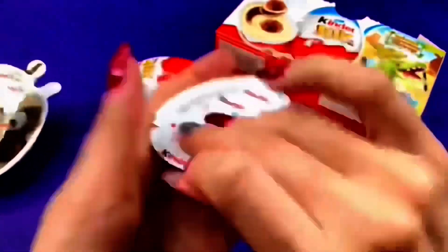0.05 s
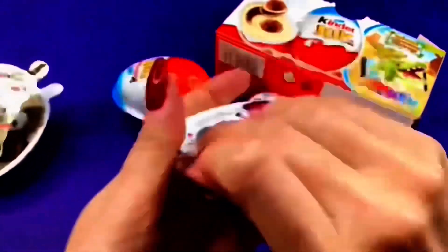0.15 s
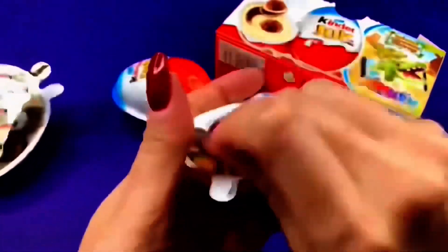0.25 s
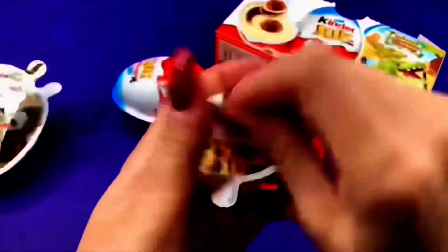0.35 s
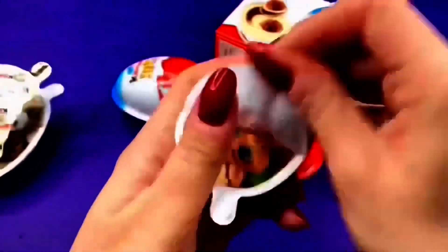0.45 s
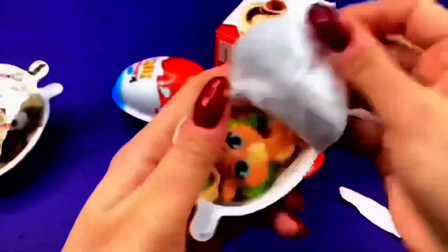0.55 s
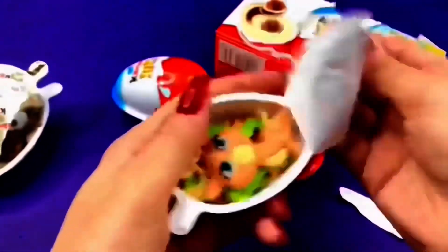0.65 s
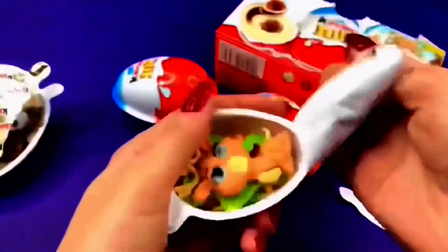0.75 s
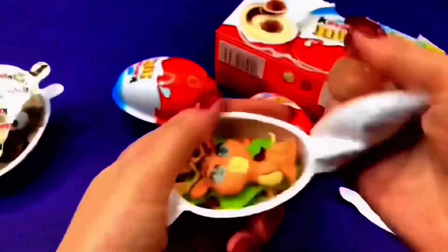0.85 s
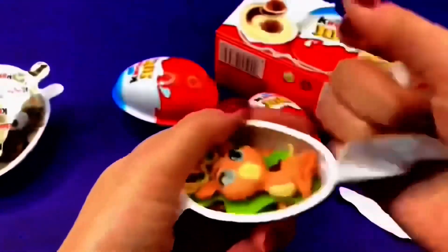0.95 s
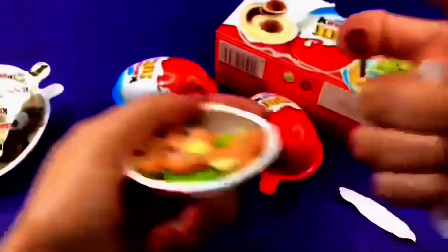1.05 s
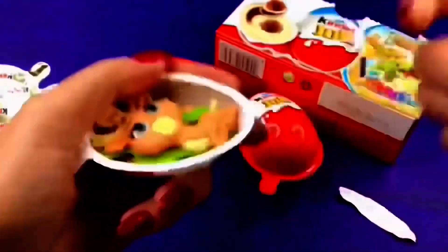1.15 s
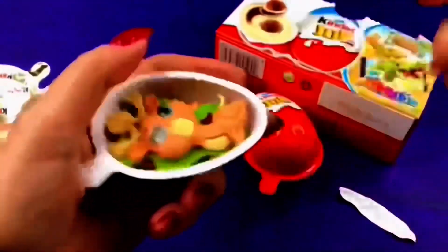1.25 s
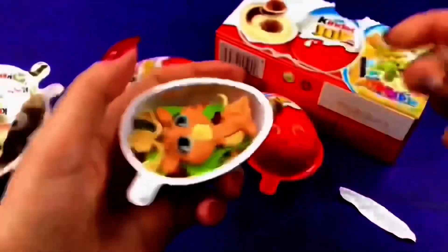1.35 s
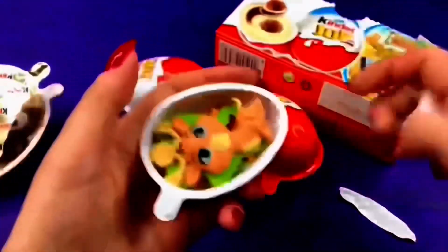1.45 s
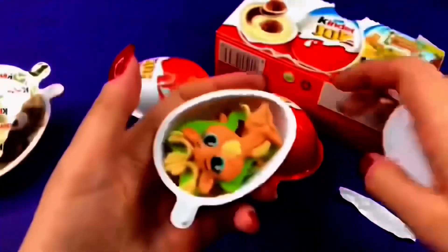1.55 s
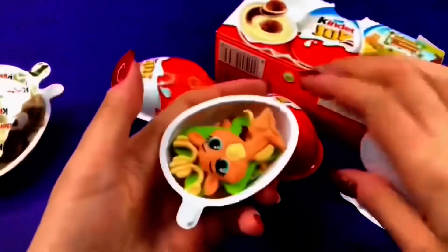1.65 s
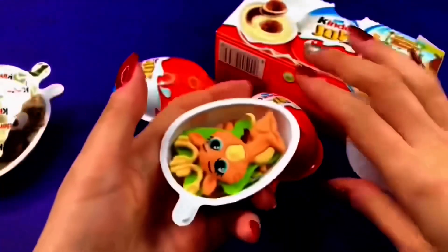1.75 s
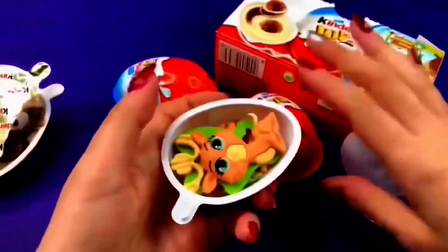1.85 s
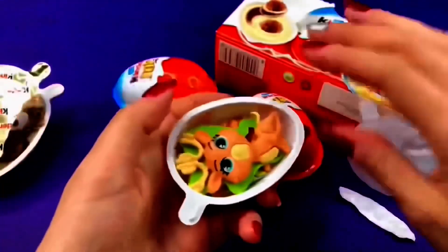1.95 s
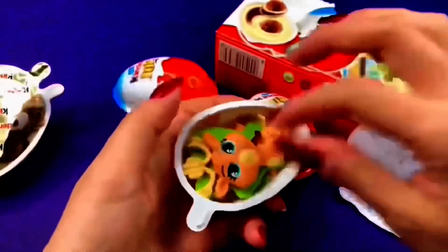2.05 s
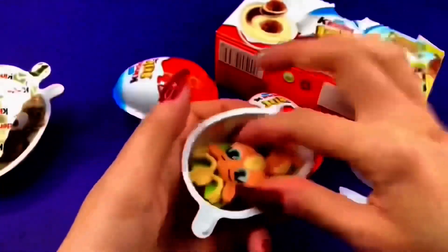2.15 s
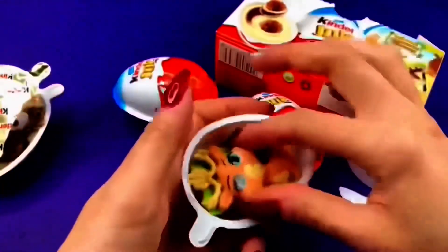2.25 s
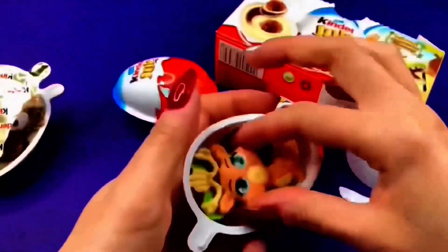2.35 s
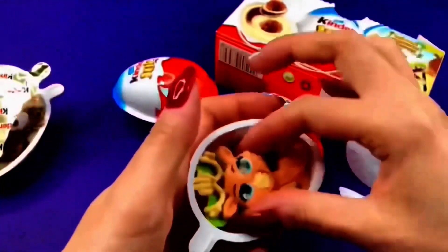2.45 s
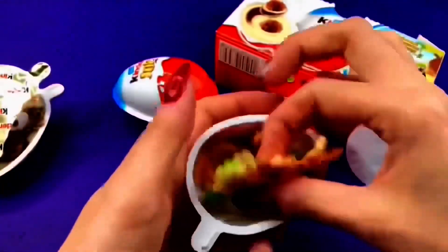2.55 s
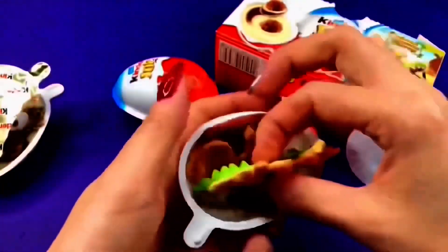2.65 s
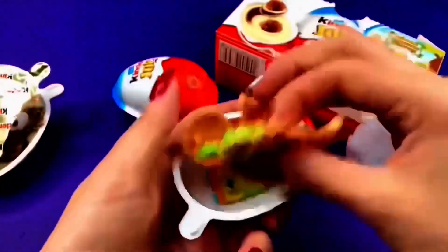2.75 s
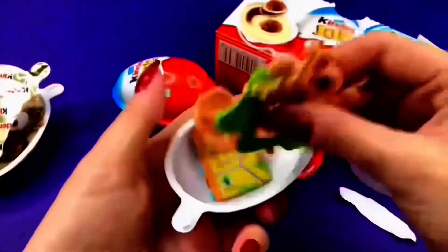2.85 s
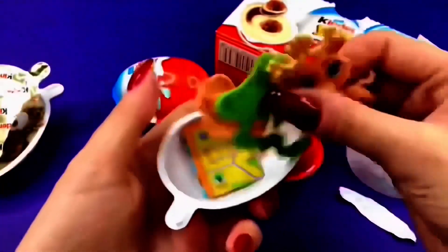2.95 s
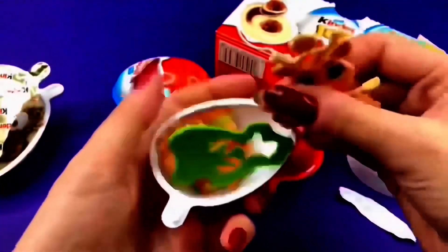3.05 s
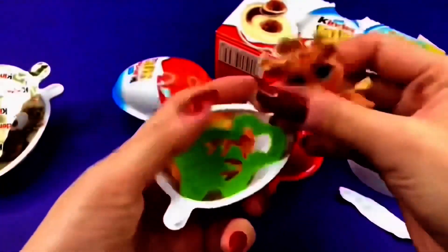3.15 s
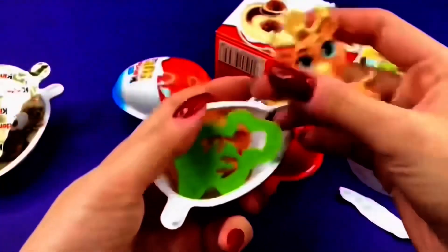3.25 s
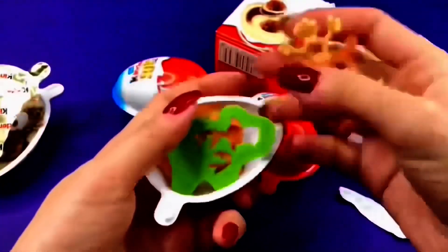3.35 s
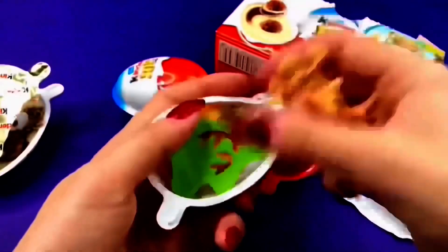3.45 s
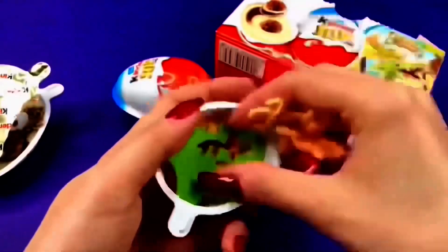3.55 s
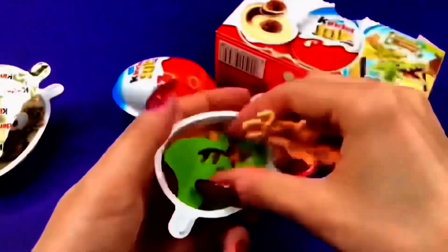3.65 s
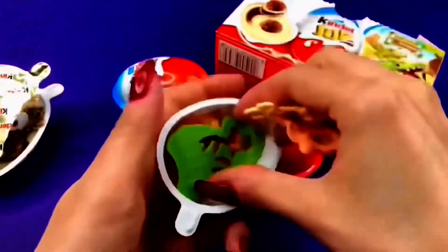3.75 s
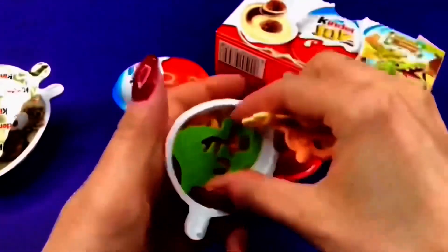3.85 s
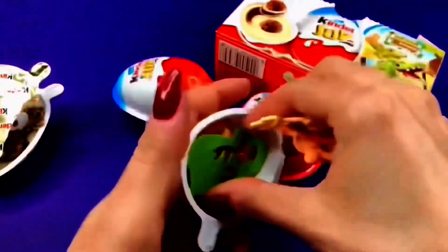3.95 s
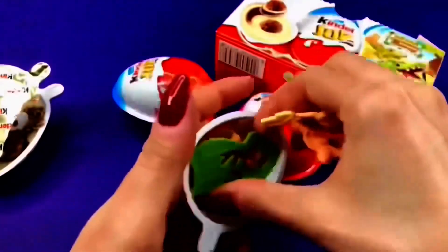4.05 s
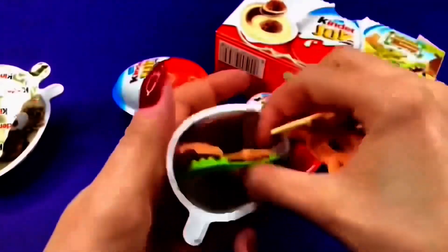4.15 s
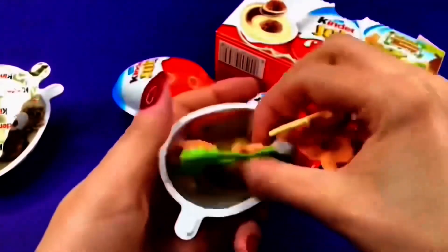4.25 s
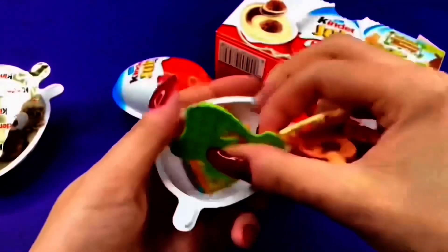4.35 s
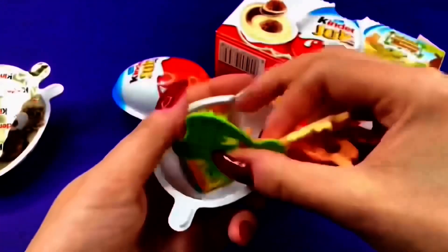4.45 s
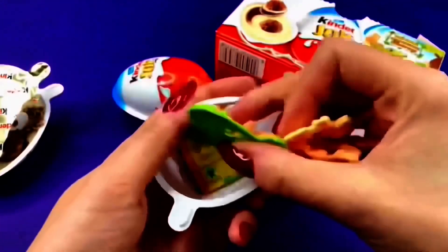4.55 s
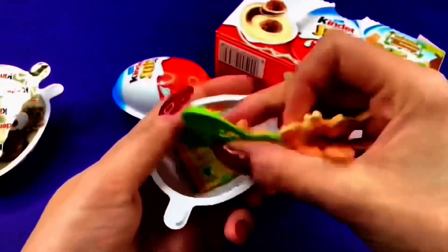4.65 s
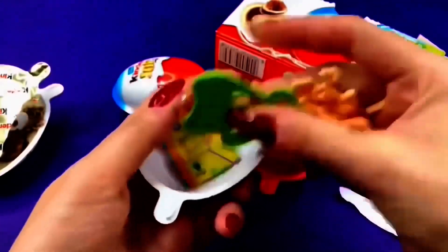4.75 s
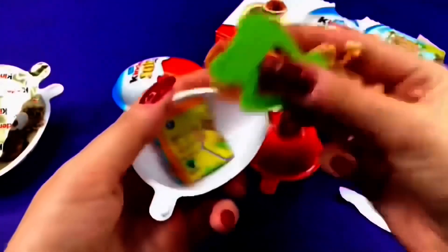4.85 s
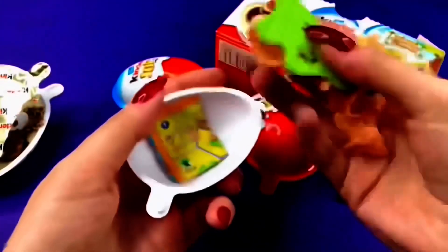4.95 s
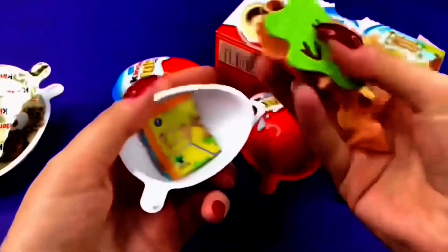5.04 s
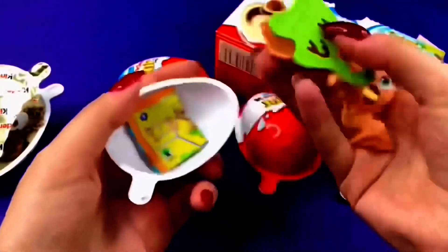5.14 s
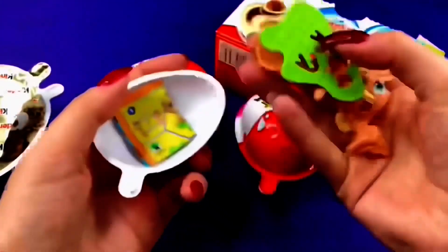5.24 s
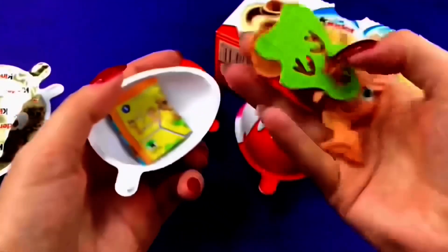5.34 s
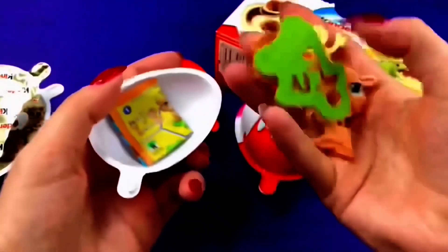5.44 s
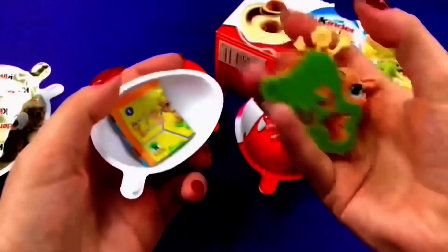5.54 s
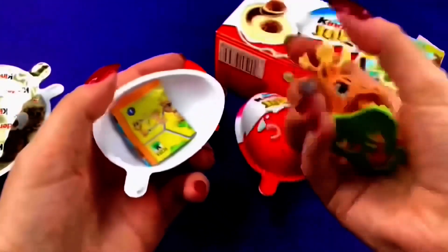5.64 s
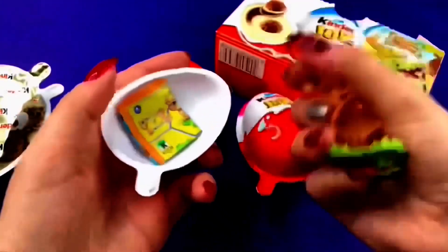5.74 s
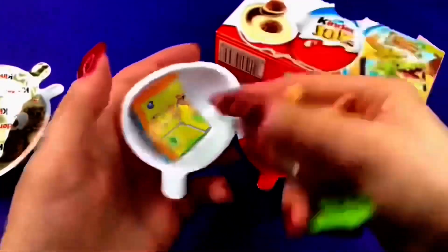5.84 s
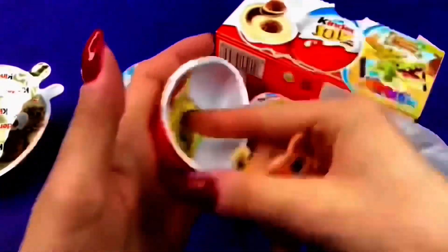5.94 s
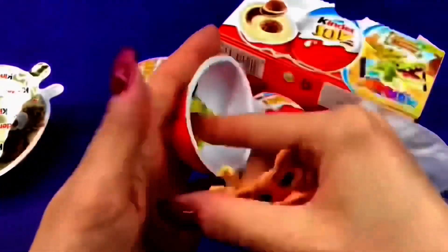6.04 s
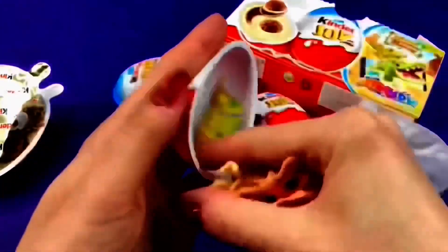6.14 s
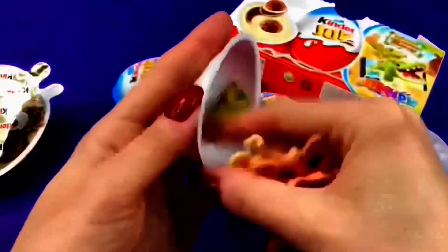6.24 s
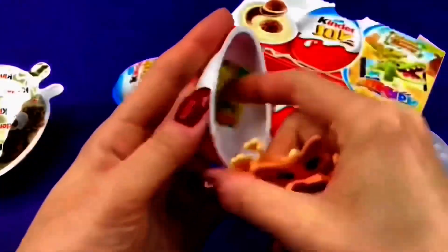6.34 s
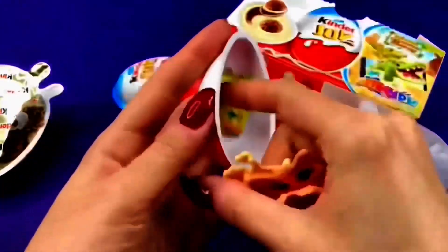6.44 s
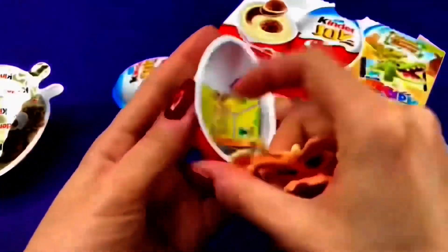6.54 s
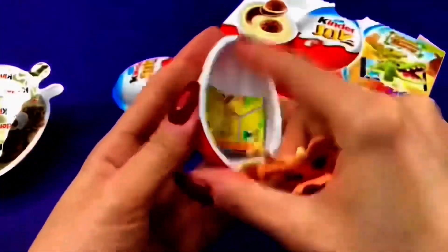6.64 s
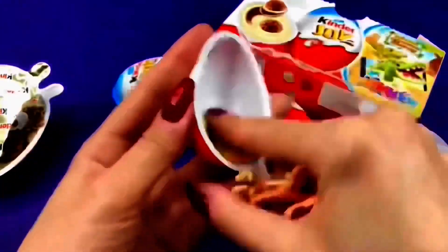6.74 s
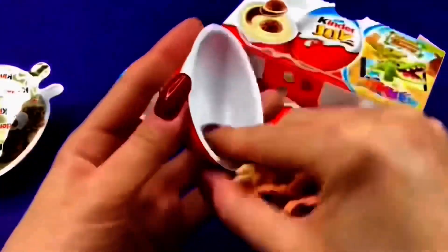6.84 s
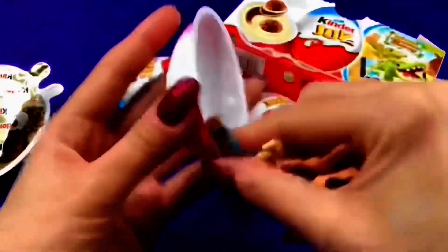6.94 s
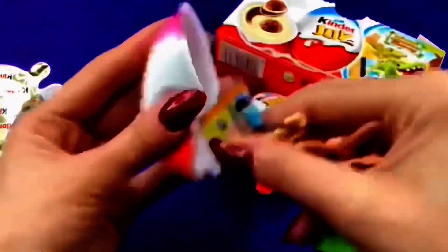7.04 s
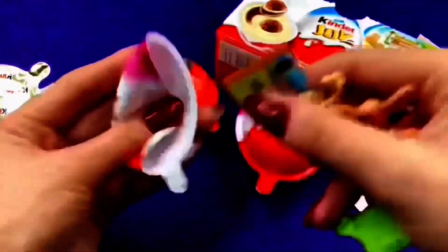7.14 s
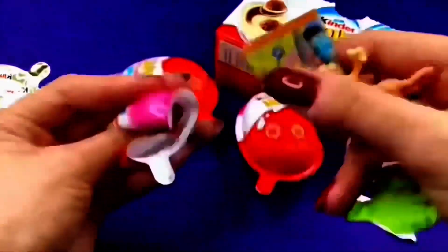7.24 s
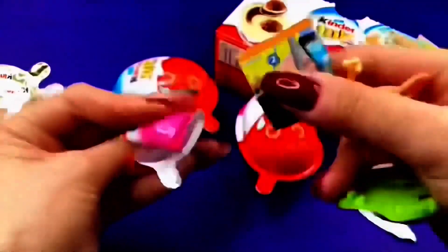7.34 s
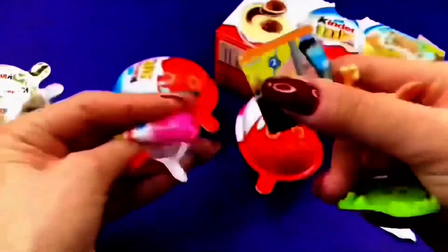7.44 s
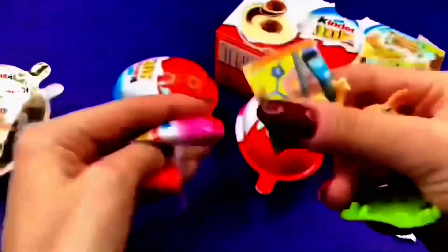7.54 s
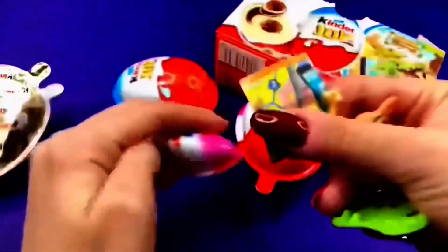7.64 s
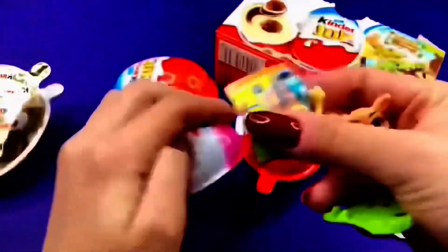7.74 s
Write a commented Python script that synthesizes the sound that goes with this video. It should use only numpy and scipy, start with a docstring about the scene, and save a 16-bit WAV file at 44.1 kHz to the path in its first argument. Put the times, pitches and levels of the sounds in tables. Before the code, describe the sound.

Very close to the microphone, a foil lid is ripped off a plastic half shell in a dense burst of loud snaps, with a few lighter crinkles after. A near-quiet pause follows, then small plastic pieces click, scrape and rattle in the hollow shell, ending in scattered sharp clacks. A faint steady low hum and soft air sit beneath in a small, dry room.

```python
"""Foil lid and plastic shell

Close to a microphone, hands peel a foil lid off a plastic half shell, crumple it, and pick
small plastic parts out of the shell. Snaps and clicks are short decaying rings with a noise crack
and a blunt push. The rustle of rubbing fingers is dense random slips, coloured and resonated.
A machine hums low as a few sines, over filtered-noise air, in a small room of sparse echoes."""
import sys
import numpy as np
from scipy import signal
from scipy.fft import rfft, irfft
from scipy.io import wavfile
from scipy.ndimage import uniform_filter1d

SR = 44100
rng = np.random.default_rng(int(sys.argv[2]) if len(sys.argv) > 2 else 0)


def master_out(mix):
    """Clip the mix to full scale and print it as 16-bit PCM to the path in sys.argv[1]."""
    frames = np.transpose(np.atleast_2d(mix))
    ceiling = np.clip(frames, -1, 1)
    pcm = np.round(ceiling * 32767).astype(np.int16)
    wavfile.write(sys.argv[1], SR, pcm)


N = 343539

# room air and rumble, relative colour: f/Hz, density/dB per Hz
AIR_COLOUR = [(4, -7), (9, 6), (20, -11.5), (45, -16.5), (105, -20.5), (150, -32), (230, -30), (500, -40.5),
              (2000, -52.5), (8000, -61.5), (16000, -61.5)]
AIR_DB = -45  # middle of the slow swell
# machine hum: f/Hz, middle rms level/dB
HUM_TONES = [(41.7, -59), (83.4, -52.5), (100, -64), (125, -55.5), (226, -73.5)]
# room decay: f/Hz, T60/s
ROOM_DECAY = [(600, 0.23), (2400, 0.11), (6000, 0.057), (14000, 0.24)]
# slow puffs of air or jolts that reach the microphone: t/s, peak level/dB
BUMPS = [(0.239, -42), (0.382, -31), (0.651, -51), (1.021, -21.5), (2.158, -30.5), (2.566, -28),
         (5.93, -36)]
# steep loss of the highest treble: f/Hz, level/dB
TOP_EDGE = [(15500, -1), (16000, -24.5), (17000, -27.5)]
EDGE_HZ = 16800  # band limit

# faint rustle of hands that merely hold and shift: t/s, body level/dB, fizz level/dB
REST = [(0, -56, -58), (0.2, -65, -67.5), (0.26, -61, -83), (0.7, -45, -54), (1.1, -58.5, -67),
        (1.499, -71, -68), (1.661, -80.5, -75.5), (2.3, -65.5, -78), (2.7, -66.5, -62.5), (2.93, -83, -86),
        (3.199, -55.5, -68), (3.659, -67, -76.5), (4.2, -55, -64), (4.5, -63.5, -65.5), (5.099, -81, -79.5),
        (5.6, -66, -62.5), (5.88, -84.5, -85), (6.201, -52.5, -64), (6.65, -65.5, -65.5),
        (7.099, -52.5, -63.5), (7.26, -61.5, -67.5), (7.421, -75, -77), (7.79, -65, -61.5)]
# strokes of fingers over foil, parts and wall:
# start t/s, length/s, body level/dB, fizz level/dB, change along the stroke/dB
STROKES = [(0.02, 0.064, -35, -55, -22), (0.225, 0.011, -16.5, -20.5, -1.5), (0.258, 0.038, -37.5, -41, 5),
           (0.32, 0.12, -40.5, -42.5, -7), (0.418, 0.065, -20.5, -26.5, -21.5),
           (0.485, 0.11, -32.5, -39, 3), (0.635, 0.12, -20.5, -25.5, -24.5), (0.748, 0.093, -52, -49, -10),
           (0.859, 0.12, -57, -49.5, 6), (1.009, 0.097, -25, -27.5, -30), (1.208, 0.094, -56.5, -56, 11),
           (1.421, 0.092, -61, -69.5, 13.5), (1.721, 0.028, -52, -56, 2.5), (1.798, 0.028, -56, -60.5, 4.5),
           (1.879, 0.081, -55, -65, -5.5), (2.005, 0.053, -45.5, -59, -6.5),
           (2.142, 0.047, -30.5, -37.5, -5), (2.283, 0.048, -54, -67, 5.5), (2.433, 0.14, -49, -62, 5.5),
           (2.539, 0.07, -30.5, -31.5, -8), (2.637, 0.092, -43, -50, -18), (2.723, 0.086, -47, -50, 1.5),
           (2.832, 0.064, -58.5, -65, 9.5), (2.96, 0.078, -44, -48, -10.5), (3.048, 0.12, -29.5, -37, -17),
           (3.385, 0.036, -40.5, -50, -7), (3.445, 0.046, -37, -42.5, -9), (3.516, 0.09, -41, -51.5, -4),
           (3.691, 0.075, -40.5, -49, -3.5), (3.788, 0.099, -56.5, -71, 3), (3.931, 0.1, -46, -49.5, -17),
           (4.075, 0.036, -39.5, -52, -5), (4.116, 0.029, -35.5, -41.5, 4.5), (4.18, 0.11, -65, -60, -7),
           (4.281, 0.051, -41, -42.5, 3), (4.353, 0.11, -66, -66.5, 8), (4.528, 0.025, -35, -37, -10),
           (4.59, 0.141, -68, -69, 14.5), (5.388, 0.015, -49.5, -49.5, -7), (5.461, 0.098, -62, -60, 4),
           (5.605, 0.13, -56, -58, -3), (5.918, 0.13, -44, -56.5, -19.5), (6.031, 0.095, -65, -73, 28.5),
           (6.098, 0.12, -43.5, -53, -1), (6.333, 0.052, -40.5, -44.5, -10), (6.44, 0.1, -59.5, -62.5, 2.5),
           (6.596, 0.029, -50, -64, -1.5), (6.665, 0.011, -36, -33, -6), (6.697, 0.12, -48.5, -55.5, 3),
           (6.798, 0.16, -32.5, -41.5, -16.5), (6.982, 0.057, -37.5, -48, -1.5),
           (7.105, 0.11, -26.5, -36, -32), (7.308, 0.03, -58.5, -58.5, 7.5),
           (7.483, 0.047, -54.5, -52.5, -2), (7.547, 0.058, -49, -47.5, 4.5),
           (7.593, 0.018, -28.5, -34.5, -4.5), (7.697, 0.041, -54, -56.5, -1.5)]
GRIP_S, LET_GO_DB_PER_S = 0.0096, -700  # how fast a stroke starts and dies away
# relative colour of rubbed sheet and wall: f/Hz, density/dB per Hz
BODY_COLOUR = [(150, -10.5), (500, -3.5), (1000, 3), (1600, -0.5), (2600, 0.5), (3200, -3.5), (4500, -17.5),
               (6000, -46)]
# how the hollow of the shell rings under the rubbing:
# t/s, share of the body power (0-1), narrow part of that ring (0-1)
HOLLOW = [(0, 0.2, 0), (1.4, 0.53, 0), (2.499, 0.35, 0.5), (3.5, 0.53, 0.71), (4.2, 0.53, 0.4),
          (5, 0.57, 0.03), (6.201, 0.25, 0.2), (6.749, 0.93, 0.5), (7.05, 0.85, 0.7), (7.149, 0.58, 0),
          (7.6, 0.4, 0.07)]
# the grip moves the pitch of the hollow a little; the drift is smoothed once more
HOLLOW_HZ, DRIFT_HZ, WIDE_HZ, NARROW_HZ = 2361, 89.54, 910, 427
LAYER_DRIFT_DB, CATCH_SIZE = 2.4, 1.1  # slow drift of each rubbing layer, scale of the catch sizes

# relative colour of cracks and fizz below and above the dip near 8 kHz: f/Hz, density/dB per Hz
CRACK_COLOUR = [(1500, -30), (3500, -1), (5800, -1), (7300, 3.5), (8000, -3.5), (9000, -24)]
HISS_COLOUR = [(7500, -27.5), (8600, -2.5), (9800, -0.5), (13500, -4.5), (17000, -5)]
# how bright the hiss of snaps and rubbing is over time: t/s, level/dB
TREBLE = [(0.24, 5.5), (0.3, -1), (0.7, -1.5), (1.05, 1.5), (2.201, -2), (2.56, 0.5), (3.06, -2),
          (4.1, -1.5), (4.33, -1), (4.6, -5.5), (5.2, 7), (5.6, -1.5), (6.7, -0.5), (7.12, 4.5), (7.3, 7.5),
          (7.55, -4.5), (7.75, -5.5)]

# a fingertip sticks and slips along the wall: from t/s, to t/s, slips per s,
# middle ring peak level/dB, ring f/Hz, crack level/dB, thump peak level/dB
JUDDER = 6.162, 6.226, 155, -28, 2350, -56, -40
# clicks of plastic parts, nails and shell:
# t/s, ring peak level/dB, ring f/Hz, crack level/dB, thump peak level/dB
PLASTIC = [(2.3285, -26.5, 2360, -39, -34.5), (2.4659, -28, 2350, -46.5, -48),
           (2.5292, -11.5, 2210, -28, -38), (2.545, -20.5, 1750, -33, -41), (2.566, -20, 2190, -33, -20),
           (2.5529, -17.5, 1980, -22, -29), (2.5745, -20, 2200, -29, -18), (2.6483, -35, 830, -33, -30),
           (2.7392, -32, 2200, -45, -35), (2.7429, -25, 2420, -41, -31.5),
           (2.7617, -22.5, 2150, -34.5, -31), (2.7942, -32.5, 1680, -28.5, -48),
           (2.9651, -25.5, 2300, -30, -39), (2.9903, -7.5, 2190, -22.5, -21.5),
           (3.0164, -18.5, 2120, -52, -28), (3.0545, -5, 2360, -14.5, -17), (3.0594, -11, 2500, -9, -6),
           (3.0779, -12.5, 2230, -22, -21), (3.0961, -18, 2120, -23, -23), (3.1238, -21, 2410, -47, -19.5),
           (3.147, -30, 2370, -42, -26), (3.1617, -25.5, 2500, -31.5, -33), (3.207, -40, 2390, -38, -48),
           (3.4041, -24, 2660, -36.5, -32), (3.4165, -41, 3000, -42, -44), (3.44, -44, 2310, -38.5, -45),
           (3.4561, -13.5, 2310, -23, -34), (3.481, -31, 3540, -44, -52), (3.5028, -36, 2200, -41, -32),
           (3.5066, -24, 2490, -37, -29), (3.5501, -27, 2250, -53, -32), (3.5592, -25, 2440, -47, -39),
           (3.5985, -27, 2560, -57, -41), (3.6989, -31, 2250, -45, -34), (3.715, -16, 2440, -24, -37),
           (3.7176, -18, 2390, -29.5, -30.5), (3.9519, -32, 2570, -44, -32.5),
           (4.0882, -21, 2210, -27, -31), (4.1288, -30, 2500, -31, -20), (4.1341, -20, 1070, -33, -24),
           (4.142, -19, 2380, -27, -21), (4.1538, -25, 1290, -43, -24), (4.181, -33, 2370, -39, -39),
           (4.2326, -28, 2200, -31.5, -34), (4.236, -36, 2170, -33, -43), (4.269, -23.5, 2430, -46, -44),
           (4.2763, -19, 1430, -29, -26.5), (4.295, -19.5, 2650, -32, -36), (4.4111, -35, 2550, -56, -41),
           (4.492, -43.5, 3760, -48, -58), (4.5332, -28, 3640, -41, -49), (4.5399, -30, 2430, -42.5, -34.5),
           (4.591, -51.5, 3000, -40, -60), (4.6088, -34, 2570, -51, -43), (4.7111, -27.5, 2540, -33.5, -37),
           (4.7283, -25.5, 2430, -29, -46), (4.8664, -37.5, 2355, -51.5, -62.5),
           (4.8825, -36.5, 3620, -44.5, -43), (4.91, -50.5, 3130, -49, -51.5),
           (4.9511, -53, 3930, -45.5, -52), (5.037, -56, 3000, -53, -60), (5.154, -54, 2737, -56, -60.5),
           (5.2044, -68.5, 3380, -36.5, -52), (5.395, -45.5, 3070, -43.5, -58),
           (5.4705, -44, 2650, -36, -65.5), (5.534, -38.5, 3450, -41, -56.5), (5.5539, -41, 2350, -40, -55),
           (5.62, -43, 2920, -44, -54), (5.6631, -30.5, 2450, -31, -48), (5.9207, -37.5, 2330, -44, -43),
           (5.9283, -3, 2520, -22, -51.5), (6.1208, -23, 2560, -32, -26), (6.1255, -11, 2360, -23, -17.5),
           (6.2532, -23, 2600, -42, -48), (6.2857, -23.5, 2600, -36.5, -49),
           (6.2946, -17.5, 2410, -33, -63), (6.3657, -19.5, 2330, -41, -57),
           (6.3788, -31, 2470, -52.5, -55), (6.6656, -29, 2360, -50, -33.5), (6.6705, -9.5, 2350, -16, -50),
           (6.691, -21, 1030, -39, -38), (6.7144, -8.5, 2470, -29, -26.5), (6.8096, -9, 2450, -16, -58),
           (6.9792, -21, 2390, -28, -46), (6.9834, -11, 2320, -14, -44), (6.9879, -11.5, 2480, -28, -50),
           (7.0721, -22.5, 2370, -40, -47), (7.0826, -21.5, 2130, -35, -26.5),
           (7.1121, -3, 2330, -11.5, -17.5), (7.3449, -50, 1710, -42.5, -35),
           (7.4746, -31.5, 2930, -50, -55), (7.5358, -6.5, 2710, -14, -39), (7.6044, -16, 2910, -22, -20.5),
           (7.6147, -14, 1310, -29.5, -16), (7.617, -20.5, 420, -47, -24)]
SHELL_T60_MS, SHELL_SPREAD_DB = 9, 7.5  # usual ring time of a click, and its chance as a dB factor
# foil snaps: t/s, ring peak level/dB, ring f/Hz, crack level/dB, thump peak level/dB, ring T60/ms
FOIL = [(0.0024, -12, 1500, -38, -35.5, 10.6), (0.0262, -7, 3530, -19.5, -33, 9.9),
        (0.0617, -15, 1080, -48.5, -33, 3.6), (0.2296, -2.5, 990, -8.5, -21.5, 8.6),
        (0.2325, -5.5, 3760, -12, -21, 7.2), (0.2362, -7.5, 1290, -13, -27, 6),
        (0.2398, 1, 2170, -9, -26, 8.2), (0.2437, 0, 1710, -10.5, -30, 3.1),
        (0.2735, -6.5, 1300, -29.5, -35.5, 4.2), (0.2824, -4, 1880, -15.5, -31, 6.6),
        (0.2951, -1, 2180, -12, -25, 11), (0.3299, -0.5, 1860, -14, -29, 9.4),
        (0.3346, -7.5, 1740, -24, -32.5, 10), (0.351, -2, 2120, -16.5, -25, 3.6),
        (0.3528, -0.5, 1720, -11.5, -27, 11.3), (0.3675, -21, 1000, -40.5, -31.5, 7.6),
        (0.3855, 2, 1950, -27, -17, 5.5), (0.389, -1.5, 850, -26.5, -21.5, 5.2),
        (0.395, -10, 1490, -38, -31.5, 5.4), (0.4095, -9, 2182, -28.5, -37, 4.1),
        (0.424, 0.5, 2500, -11.5, -17, 6.6), (0.4325, 0.5, 1150, -21, -26.5, 7.6),
        (0.4578, 1.5, 2240, -30.5, -30.5, 3.7), (0.464, -14, 1264, -33, -26.5, 6.9),
        (0.5015, -6, 1680, -30.5, -30, 4.8), (0.515, -3, 2100, -19, -30, 9.5),
        (0.5245, -6.5, 1440, -20, -21, 27), (0.529, 11.5, 2430, -21, -26.5, 9.4),
        (0.5408, -16, 2480, -11, -26.5, 4.3), (0.5635, -11.5, 2490, -25.5, -31.5, 7.2),
        (0.5886, -13, 1340, -27, -28.5, 8.6), (0.6003, -8, 2410, -31, -28, 9),
        (0.6403, 3.5, 2120, -11.5, -27, 11.4), (0.652, 4, 2330, -8, -34.5, 15),
        (0.6563, 6, 2150, -17, -7, 8.6), (0.6722, -5, 2320, -21, -38.5, 8), (0.676, -6, 2170, -23, -38, 12),
        (0.692, -6, 2420, -16, -61, 11.4), (0.8133, -33, 1730, -33.5, -51.5, 12),
        (0.87, -17, 3400, -26.5, -68.5, 6.5), (0.9271, -13, 3130, -18, -20.5, 14),
        (0.948, -20, 3730, -36, -40, 13), (0.9532, -15.5, 2810, -40, -32, 5.2),
        (1.0066, -4.5, 3560, -15, -30, 4.5), (1.0206, -3.5, 3530, -5.5, -3, 1.9),
        (1.0232, -15.5, 2450, -15.5, -22, 18), (1.0568, -15, 2660, -36, -50, 5.2),
        (1.2035, -30, 2700, -29.5, -30.5, 10.6), (1.2553, -22, 2290, -47, -57, 6.8),
        (1.276, -32, 1540, -36.5, -48, 6.3), (1.293, -31, 2000, -44.5, -40, 4.9),
        (1.3022, -20, 4570, -33, -37, 9.2), (1.3453, -32, 1216, -41, -29, 6.8),
        (1.4602, -26, 2283, -60, -26, 6.8), (1.7425, -27.5, 2360, -42.5, -35, 7.4),
        (1.8691, -17.5, 2155, -31, -12.5, 14), (2.1535, -16.5, 2400, -48.5, -40.5, 8.4),
        (2.1581, -26, 2260, -38, -49, 8.2), (2.1756, -27, 2230, -45, -14.5, 4.3),
        (2.1905, -15.5, 2220, -29, -44, 13), (2.1942, -14.5, 2400, -33, -47, 13)]
FOIL_RISE, SHELL_RISE, HISS_FADE = .045, .035, .75  # start as share of ring time; power on hiss fade


def gain_of(db):
    """Decibels to a factor."""
    return 10 ** (np.asarray(db) / 20)


def evened(x):
    """Scales to rms 1."""
    return x / np.sqrt(np.mean(x ** 2) + 1e-20)


def read(points, hz):
    """Reads a spectrum on a log-frequency axis."""
    f, value = np.transpose(points)
    return np.interp(np.log(hz + 1), np.log(f + 1), value)


def add(mix, s, sound):
    """Mixes a sound in at time s."""
    part = mix[round(s * SR):][:len(sound)]
    part += sound[:len(part)]


def coloured(x, points):
    """Causal minimum-phase filter of the given spectrum, with power gain 1 for white noise."""
    log_gain = np.log(gain_of(read(points, abs(np.fft.fftfreq(4096, 1 / SR)))))
    taps = np.fft.ifft(np.exp(np.conj(signal.hilbert(log_gain)))).real[:1024]
    return signal.oaconvolve(x, taps / np.linalg.norm(taps))[:len(x)]


def wander(hz):
    """Slow chance of rms 1: noise through a one-pole low-pass with its corner at hz."""
    return evened(signal.lfilter([1], [1, -np.exp(-2 * np.pi * hz / SR)], rng.standard_normal(N)))


def air():
    """Rumble and faint hiss: shaped noise that swells slowly."""
    hz = np.fft.rfftfreq(N, 1 / SR)
    noise = irfft(rfft(rng.standard_normal(N)) * gain_of(read(AIR_COLOUR, hz)), N)
    swell = uniform_filter1d(wander(hz=4.9), 3000)
    return gain_of(AIR_DB + 2.4 * swell) * evened(noise)


def machine():
    """Steady tones that waver slightly in level."""
    t = np.arange(N) / SR
    hum = np.zeros(N)
    for hz, db in HUM_TONES:
        waver_db = 1.7 * uniform_filter1d(wander(hz=3.2), size=2000)
        tone = np.sin(2 * np.pi * (hz * t + rng.random()))
        hum += np.sqrt(2) * gain_of(db + waver_db) * tone  # sqrt 2 turns rms into peak
    return hum


def room(x):
    """Sparse echoes of random sign, each band dying at its own speed."""
    taps = np.zeros(SR // 2)
    at = np.arange(120, SR // 2 - 20, 20)
    taps[at + rng.integers(0, 20, len(at))] = rng.choice([-1., 1.], len(at))
    hz, t, z = signal.stft(taps, SR, nperseg=256)
    t60 = np.maximum(read(ROOM_DECAY, hz), .02)[:, None]
    tail = signal.istft(z * gain_of(-60 * t / t60), SR, nperseg=256)[1]
    return signal.fftconvolve(x, tail / np.linalg.norm(tail))[:N]


def bumps(length_s):
    """Pressure swells that jump out, then sag below rest and slowly return."""
    out = np.zeros(N)
    u = np.arange(4000) / SR / length_s
    puff = u * (2 - u) * np.exp(-u)
    for s, db in BUMPS:
        add(out, s, gain_of(db) * puff / puff.max())
    return out


def treble():
    """Gain of the hiss over time."""
    return gain_of(np.interp(np.arange(N) / SR, *np.transpose(TREBLE)))


def stroke_gains():
    """Each stroke grips quickly, drifts in level and lets go; powers add over the resting rustle."""
    s, *rest_db = np.transpose(REST)
    power = gain_of([np.interp(np.arange(N) / SR, s, db) for db in rest_db]) ** 2
    for start, length, body_db, fizz_db, change_db in STROKES:
        t = np.arange(0, length + .2, 1 / SR)
        drift_db = change_db * np.minimum(t / length, 1)
        let_go_db = LET_GO_DB_PER_S * np.maximum(t - length, 0)
        shape = np.minimum(t / GRIP_S, 1) * gain_of(drift_db + let_go_db)
        for level, db in zip(power, (body_db, fizz_db)):
            add(level, start, (gain_of(db) * shape) ** 2)
    return np.sqrt(power)


def resonate(x, hz, width_hz):
    """Moving resonance: shifts the curve hz down to zero, smooths twice, and shifts back."""
    turn = np.exp(2j * np.pi * np.cumsum(hz) / SR)
    r = np.exp(-np.pi * width_hz / SR)
    return evened((turn * signal.lfilter([1], [1, -2 * r, r * r], x / turn)).real)


def patchy(x, patches_db):
    """The colour shifts in random patches of time and pitch as the contact moves."""
    z = signal.stft(x, nperseg=256)[2]
    patches = uniform_filter1d(rng.standard_normal(z.T.shape), size=7, axis=0)
    patches = uniform_filter1d(patches, size=6, axis=1)
    return signal.istft(z * gain_of(patches_db * evened(patches).T), nperseg=256)[1][:N]


def rubbing(grains_per_s, lumps_db, own_db, hiss_db):
    """Dense tiny slips of uneven size, in lumps, shake the sheet, ring the hollow and fizz."""
    t = np.arange(N) / SR
    # four layers: sheet, hollow, crack, hiss
    size = gain_of(3.5 * np.minimum(rng.exponential(1, (4, N)), 5)) * rng.choice([-1., 1.], (4, N))
    slips = evened(size * (rng.random((4, N)) < grains_per_s / SR))
    slips += 0.61 * rng.standard_normal((4, N))
    own = np.array([wander(hz=5.7) for _ in range(3)])[[0, 0, 1, 2]]  # sheet and hollow drift together
    lumps = lumps_db * wander(hz=70) + own_db * own
    # now and then an edge catches and lets go
    catches = np.minimum(rng.exponential(CATCH_SIZE, N), 2 * CATCH_SIZE) * (rng.random(N) < 90 / SR)
    catches = np.tile(catches, (4, 1))
    catches[2:] *= 1.4 * rng.random((2, N))  # the fizz takes a share of its own
    ticks = 1 + signal.lfilter([1], [1, -np.exp(-1 / (0.0035 * SR))], catches)
    sheet, hollow, crack, hiss = evened(slips * ticks * gain_of(uniform_filter1d(lumps, 60)))

    s, *shares = np.transpose(HOLLOW)
    share, narrow = np.clip([np.interp(t, s, v) for v in shares], 0, 1)
    hz = HOLLOW_HZ + DRIFT_HZ * uniform_filter1d(wander(hz=7.0), size=400)
    rung = (1 - narrow) * resonate(hollow, hz, WIDE_HZ) + narrow * resonate(hollow, hz, NARROW_HZ)
    body = np.sqrt(1 - share) * coloured(sheet, BODY_COLOUR) + np.sqrt(share) * rung
    fizz = coloured(crack, CRACK_COLOUR) + gain_of(hiss_db) * treble() * coloured(hiss, HISS_COLOUR)
    body_gain, fizz_gain = stroke_gains()
    return patchy(body, patches_db=1.5) * body_gain + patchy(fizz, patches_db=3.0) * fizz_gain


def judder():
    """Click rows for a run of slips, uneven in timing and level."""
    start, end, per_s, ring_db, *rest = JUDDER
    chance = rng.standard_normal((40, 2))
    times = np.arange(start, end, 1 / per_s)
    return [(s + 0.15 * a / per_s, ring_db + 2.9 * b, *rest) for s, (a, b) in zip(times, chance)]


def snaps(rows, hiss_db, rough, rise, thump_s, after_db, after_hz, after_s):
    """Each buckle rings a few rough cycles, with a noise crack, a blunt push and a weak shudder after."""
    t = np.arange(-100, 1000) / SR  # time from the peak
    ring, crack, hiss = np.zeros((3, N))
    chance = rng.standard_normal((len(rows), 2, 1108))
    for (s, ring_db, hz, crack_db, thump_db, t60_ms), (draw, more) in zip(rows, chance):
        begin = s + t[0]
        t60 = max(t60_ms, 1) / 1000
        swell = np.exp(-(np.minimum(t, 0) / (rise * t60)) ** 2)  # longer buckles also start softer
        fade = swell * gain_of(-60 * np.maximum(t, 0) / t60)

        wobble = uniform_filter1d(draw[8:] + 1j * more[8:], size=22)
        wobble = evened(wobble.view(float)).view(complex)
        second_hz = hz * gain_of(3.5 * np.tanh(draw[3]))  # a second mode of its own
        pair = np.exp(2j * np.pi * hz * t) + 0.39 * np.exp(2j * np.pi * second_hz * t)
        modes = (pair * (1 + rough * wobble)).imag * fade  # many neighbour modes blur the main one
        add(ring, begin, gain_of(ring_db) * modes / abs(modes).max())

        u = np.maximum(t + .001, 0) / (thump_s * gain_of(0.17 * draw[7]))
        push = np.sign(draw[6]) * u * (2 - u) * np.exp(-u)  # out and slowly back, no net air moved
        add(ring, begin, gain_of(thump_db) * push / abs(push).max())

        shudder_hz = after_hz * gain_of(1.5 * draw[5])
        shudder = (np.exp(2j * np.pi * shudder_hz * t) * wobble[::-1]).real * (t > 0)
        add(ring, begin, gain_of(ring_db + after_db - 60 * abs(t) / after_s) * shudder)

        add(crack, begin, gain_of(crack_db) * draw[8:] * fade)
        hiss_gain = gain_of(crack_db + hiss_db + 1.2 * draw[4])
        add(hiss, begin, hiss_gain * more[8:] * fade ** HISS_FADE)
    return ring + coloured(crack, CRACK_COLOUR) + treble() * coloured(hiss, HISS_COLOUR)


def scene():
    """Hands, the room echo of their snaps and clicks, jolts, hum and air."""
    foil = snaps(FOIL, hiss_db=-1.5, rough=0.28, rise=FOIL_RISE, thump_s=0.00014,
                 after_db=-23.5, after_hz=1162, after_s=0.023)
    clicks = [*PLASTIC, *judder()]
    ring_ms = SHELL_T60_MS * gain_of(SHELL_SPREAD_DB * rng.uniform(-0.82, 1, (len(clicks), 1)))
    plastic = snaps(np.hstack([clicks, ring_ms]), hiss_db=-4.5, rough=0.29, rise=SHELL_RISE,
                    thump_s=0.00028, after_db=-35, after_hz=1122, after_s=0.051)
    rustle = rubbing(grains_per_s=4400, lumps_db=0.4, own_db=LAYER_DRIFT_DB, hiss_db=-0.1)
    hands = foil + plastic + rustle
    echo = gain_of(-19.5) * room(foil + plastic)
    return (hands + echo + bumps(length_s=0.0023) + machine() + air())[None]


def record(dry):
    """The loudest snaps overload the input; then the highest treble drops steeply to a band limit."""
    clipped = np.clip(dry[0], -.93, .93)
    edge_gain = gain_of(read(TOP_EDGE, np.fft.rfftfreq(N, 1 / SR)))
    soft = irfft(rfft(clipped) * edge_gain, N)
    band_limit = signal.firwin(511, EDGE_HZ, window=("kaiser", 9), fs=SR)
    return signal.oaconvolve(soft[None], band_limit[None], "same")


dry = scene()
out = record(dry)
master_out(out)
```